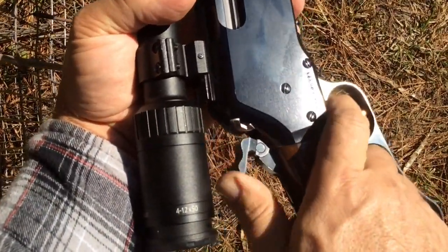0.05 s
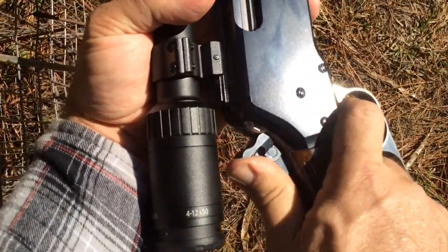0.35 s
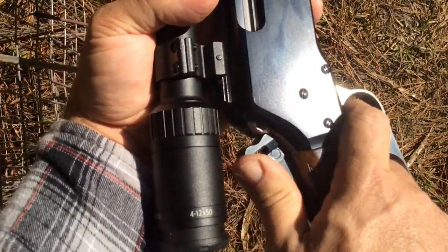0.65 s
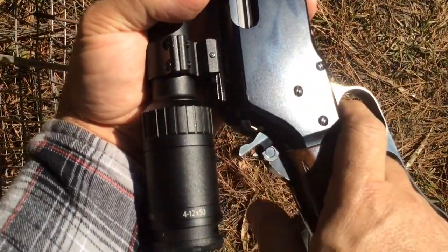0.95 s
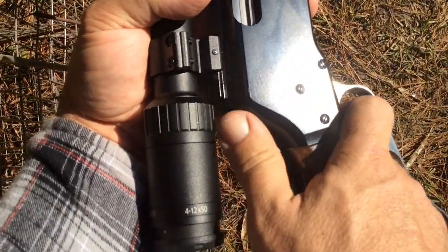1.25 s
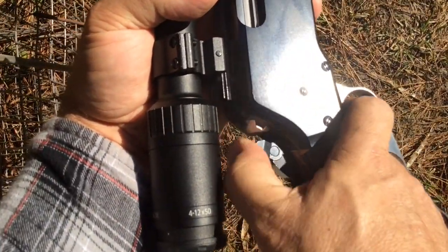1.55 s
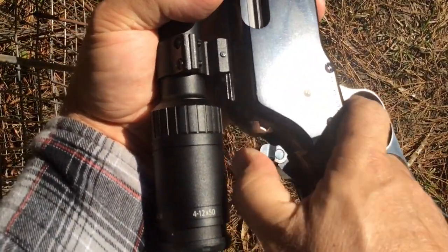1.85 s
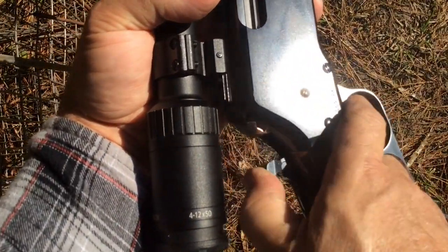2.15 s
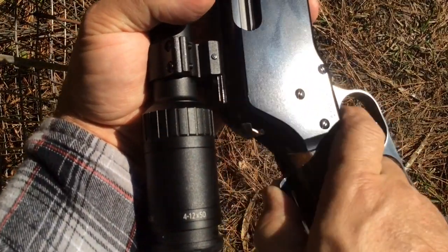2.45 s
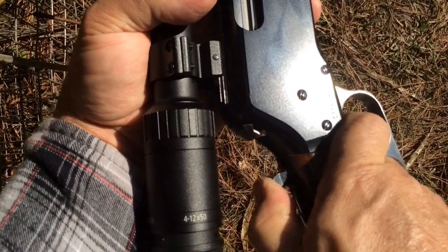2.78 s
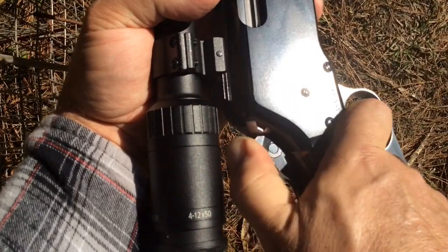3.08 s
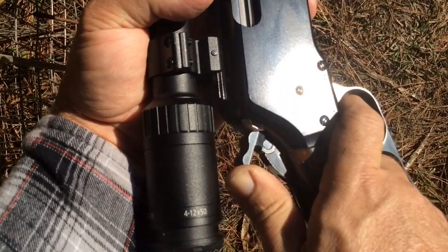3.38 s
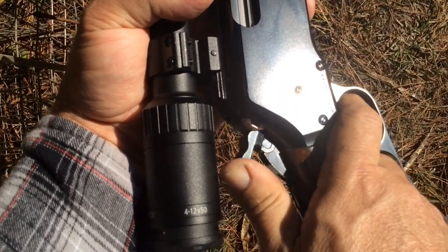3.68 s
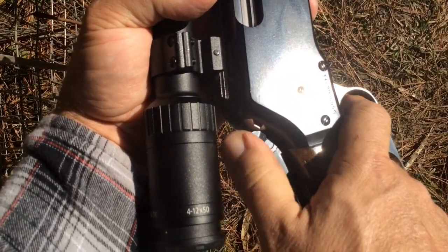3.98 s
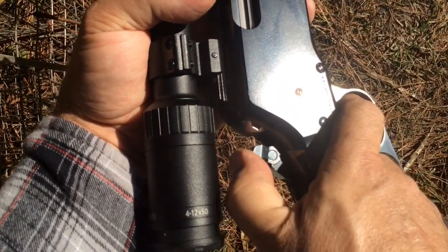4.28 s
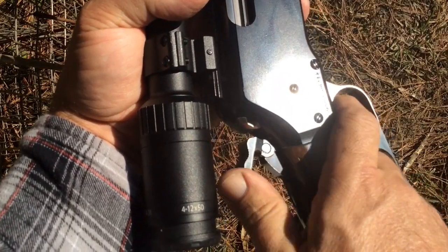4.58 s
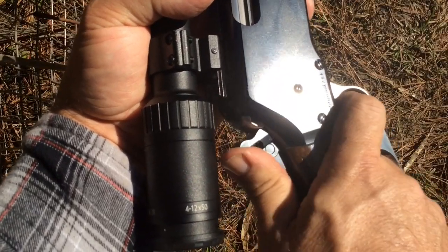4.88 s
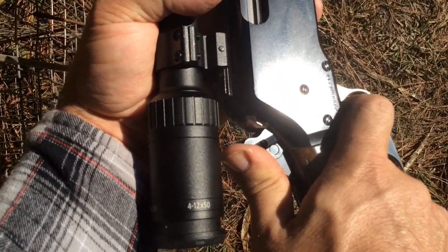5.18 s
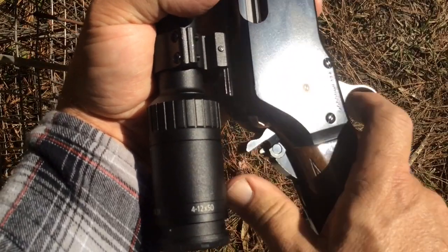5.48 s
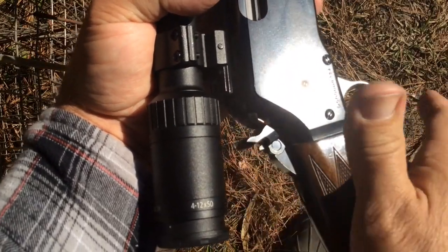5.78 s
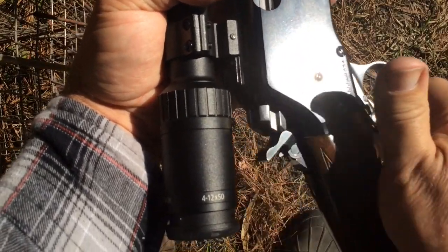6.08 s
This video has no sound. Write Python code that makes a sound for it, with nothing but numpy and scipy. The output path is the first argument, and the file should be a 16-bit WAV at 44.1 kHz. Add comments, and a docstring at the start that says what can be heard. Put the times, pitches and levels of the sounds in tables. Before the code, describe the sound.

A lever-action rifle is handled close to the microphone outdoors, sounding crisp and almost dry. From 0.3 to 0.5 seconds the hammer scrapes and catches in a run of light metallic clicks. A hard snap at 1.6 seconds thumps the wooden stock and briefly rings the springs. A sharp double click follows at 2.5, then a tiny ping and softer clicks around 3.2. Another hard, springy snap lands at 4.3 seconds, followed by small ticks and a firm double click near 4.9. Around 5.7 a hand softly rubs and bumps the stock, and at 6.2 the lever starts opening with a quick cluster of clicks. Behind this is quiet open air, with a small bird's thin rising chirps near 1.3, 2.4 and between 4.1 and 4.6 seconds. A far whirr comes and goes, and a camera ticks very faintly throughout.

```python
"""A lever-action rifle, close by outdoors: a thumb works the hammer, which scrapes, catches and snaps.
Each contact rings the steel receiver, the small parts and the wooden stock; some set springs singing.
At the end the lever starts to open with a quick cluster of clicks, and the hand rubs on the stock.
Behind it: quiet open air, a small bird's thin rising chirps, a far whirr and a camera's faint ticking."""
import sys
import numpy as np
from scipy import signal
from scipy.fft import rfft, irfft, next_fast_len
from scipy.io import wavfile

SR = 44100
rng = np.random.default_rng(int(sys.argv[2]) if len(sys.argv) > 2 else 0)


def bounce(signal):
    """Save signal as a 16-bit WAV file at the path given by the first command-line argument."""
    frames = np.transpose(np.atleast_2d(signal))
    limited = np.clip(frames, -1, 1)
    pcm = np.round(limited * 32767).astype(np.int16)
    wavfile.write(sys.argv[1], SR, pcm)


N = 274743
TIME = np.arange(N) / SR


def from_db(db):
    """Decibels to gain."""
    return 10 ** (np.asarray(db) / 20)


def unit_rms(x):
    """Scale to rms 1."""
    return x / np.sqrt(np.mean(x ** 2) + 1e-20)


def unit_burst(x):
    """Scale a burst to the energy of 10 ms at rms 1."""
    return x / np.sqrt(np.sum(x ** 2) / (SR / 100) + 1e-20)


def add(track, start_s, sound):
    """Mix a sound into a track."""
    at = int(np.clip(round(start_s * SR), 0, N))
    track[at:at + len(sound)] += sound[:N - at]


def butter(x, hz, kind, order=2):
    """Butterworth high- or low-pass."""
    return signal.sosfilt(signal.butter(order, min(hz, .45 * SR), kind, fs=SR, output="sos"), x)


def resonate(x, modes):
    """Parallel resonances of alternating sign, one per (Hz, width Hz, dB) row."""
    out = 0
    for k, (hz, width_hz, db) in enumerate(modes):
        r = np.exp(-np.pi * width_hz / SR)
        poles = [1, -2 * r * np.cos(2 * np.pi * hz / SR), r * r]
        ring = signal.lfilter([1, 0, -1], poles, x + 1e-18)
        out = out + (-1) ** k * from_db(db) * (1 - r * r) / 2 * ring
    return out


def ring_body(force, modes):
    """A struck body: each mode takes a set share of the blow's energy."""
    out = 0
    for k, (hz, width_hz, db) in enumerate(modes):
        ring = unit_burst(resonate(force, [(hz, width_hz, 0)]))
        out = out + (-1) ** k * from_db(db) * np.sqrt(width_hz) * ring
    return unit_burst(out)


def coloured_noise(spectrum):
    """Steady noise at rms 1, shaped by (Hz, dB) rows."""
    hz, db = np.transpose(spectrum)
    size = next_fast_len(N)
    bins_hz = np.maximum(np.fft.rfftfreq(size, 1 / SR), 1)
    gain = from_db(np.interp(np.log(bins_hz), np.log(hz), db))
    return unit_rms(irfft(rfft(rng.standard_normal(size)) * gain, size)[:N])


def swells(rows):
    """One Gaussian swell per (centre s, length s, dB) row."""
    return sum(from_db(db) * np.exp(-(2 * (TIME - s) / length_s) ** 2) for s, length_s, db in rows)


# Spectra of still air and a far rush. Each row: frequency in Hz, relative density in dB.
AIR_SPECTRUM = [(20, -21.5), (35, -7.5), (64, -0.5), (96, -8.5), (221, -9.5), (281, -14.5), (378, -10),
                (470, -14), (1530, -16.5), (2000, -19.5), (3000, -21.5), (6900, -30), (9000, -27.5),
                (15500, -32.5)]
RUSH_SPECTRUM = [(60, -11.5), (200, -4), (380, -0.5), (600, -0.5), (950, -1.5), (1500, 2.5), (1850, -14),
                 (2800, -11), (5000, -18.5), (14000, -27)]
# Course of the rush. Each row: time in seconds, level in dB.
RUSH_LEVELS = [(0, -84), (0.7, -76), (1.2, -86.5), (2.2, -82), (3.85, -72), (4.5, -76), (5.2, -71.5),
               (6.23, -64)]


def open_air(air_db=-69, hum_hz=68, hum_width_hz=14, hum_db=-74.5):
    """Still air, a slowly swelling far rush and a low hum."""
    air = from_db(air_db) * coloured_noise(AIR_SPECTRUM)
    rush_db = np.interp(TIME, *np.transpose(RUSH_LEVELS))
    rush = from_db(rush_db) * coloured_noise(RUSH_SPECTRUM)
    hum = unit_rms(resonate(rng.standard_normal(N), [(hum_hz, hum_width_hz, 0)]))
    return air + rush + from_db(hum_db) * hum


# The two ticks of a camera cycle. Each row: offset in seconds, level in dB, buzz decay in seconds.
TICKS = [(.0095, -75, .003), (0.0287, -74, 0.00092)]
# Tick resonances. Each row: frequency in Hz, width in Hz, gain in dB.
TICK_MODES = [(2380, 350, -7.5), (3815, 410, -9.5), (5530, 300, -4), (8430, 430, -9), (11500, 3900, -20.5)]


def camera_ticks(cycle_hz=30, buzz_gain=.35):
    """Repeating electronic ticks, each a pulse with a trace of buzz."""
    out, t = np.zeros(N), TIME[:SR // 50]
    for offset_s, db, decay_s in TICKS:
        for s in np.arange(offset_s, N / SR, 1 / cycle_hz):
            pulse = (t == 0) + buzz_gain * rng.standard_normal(len(t)) * np.exp(-t / decay_s)
            add(out, s, from_db(db) * ring_body(pulse, TICK_MODES))
    return out


def contact_force(chatter_ms, rise_ms, first_touch=1.2, settle_db=-19, settle_ms=4.2):
    """One contact builds up and chatters densely, then loose parts settle."""
    ms = np.arange(SR // 14) * 1000 / SR
    after_ms = np.maximum(ms - rise_ms, 0)
    decay = np.exp(-after_ms / chatter_ms) + from_db(settle_db) * np.exp(-after_ms / settle_ms)
    envelope = np.minimum(ms / rise_ms, 1) ** 2 * decay
    force = rng.choice([-1., 1.], len(ms)) * envelope
    force[np.argmax(envelope)] += first_touch
    return force


def thud_share_db(contact_db, base_db=-64.5, at_contact_db=-40, db_per_db=0.44):
    """Stock thud relative to its contact; the thud grows more slowly."""
    return base_db + db_per_db * (contact_db - at_contact_db) - contact_db


# Hammer, catch and lever click home. Each row: start in seconds, level in dB, treble share in dB,
# catch share in dB, moving part's pitch in Hz, its ring in dB, chatter in ms.
CLICKS = [(0.3004, -47.5, -21.5, -27, 2080, 9, 0.92), (0.4245, -34, -14, -13, 2100, 9, 2.7),
          (0.4363, -40, -10, -8, 2400, -7, 2.4), (0.4484, -38, -10.5, -10.5, 2860, -7, 2.7),
          (0.5184, -28, -13.5, -11.5, 2830, -2.5, 1.38), (2.4544, -20.5, -2, -11, 3594, -4, .65),
          (2.4763, -24, -15, -17, 2290, -1, 1.2), (2.603, -60, -1, -20, 2620, -10, 4),
          (2.676, -62.5, -8.5, -4, 2680, -4.5, 1.44), (3.1435, -37.5, -10.5, -12.5, 1620, -6.5, 1.66),
          (3.288, -42, -9.5, -6, 2780, 0.5, 1.27), (4.2087, -41, -20, -26, 1628, -1, 1.93),
          (4.3133, -16.5, -4.5, -14.5, 3070, -6.5, 1.6), (4.6107, -44, -22.5, -27, 2370, 3, 1),
          (4.7918, -47.5, -16.5, -20, 2176, 14, 1.25), (4.9296, -27.5, -5.5, -3.5, 2280, -4.5, 0.47),
          (4.9524, -23.5, -11.5, -13, 2950, 0.5, 2.72), (6.029, -50, -32.5, -15.5, 2360, 2, 2),
          (6.1799, -28, -15.5, -13.5, 3450, -2.5, 1.2), (6.2148, -35, -19, -12, 1800, -7, 1.55)]
# The hammer snap that also thumps the stock. As a click, plus thud share in dB.
THUMPING_SNAP = (1.6383, -16, -1.5, -12.5, 1640, -6, 2.5, -19.5)


def clicks():
    """Contact rows for the thumping snap and the other distinct clicks."""
    return [THUMPING_SNAP] + [(s, db, *rest, thud_share_db(db)) for s, db, *rest in CLICKS]


# Parts drag in runs of slips. Each row: start in seconds, length in seconds, first slip in dB,
# last slip in dB, treble share in dB, pitch in Hz.
SLIP_RUNS = [(0.4144, .006, -51, -39, -25, 1800), (0.452, .005, -37, -45.5, -19.5, 1460),
             (1.6272, .0065, -37, -31.5, -15, 1750), (3.2957, .007, -55, -57, -15, 1840),
             (4.44, 0.0088, -56, -67, -19, 1710), (4.9088, 0.0035, -43, -38, -25, 2070),
             (4.933, 0.014, -43.5, -56, -18, 1540), (6.173, .0165, -34, -35, -15.5, 2700)]
# Play in the action. Each row: start in seconds, level in dB, treble share in dB.
TAPS = [(2.0055, -61.5, -12), (2.1006, -65, -11), (3.2554, -66.5, 1.5), (5.1795, -63, -16.5),
        (5.4193, -55, -26.5), (6.108, -57.5, -15)]


def slips_and_taps(slip_gap_s=.0054, slip_chatter_ms=2.8, tap_hz=1630, tap_chatter_ms=1.62):
    """Contact rows for light touches; harder ones ring the catch more and the moving part less."""
    touches = [(s, db, treble_db, tap_hz, tap_chatter_ms) for s, db, treble_db in TAPS]
    for s, length_s, first_db, last_db, treble_db, hz in SLIP_RUNS:
        for u in np.linspace(0, 1, 1 + max(1, round(length_s / slip_gap_s))):
            db = first_db + u * (last_db - first_db)
            touches.append((s + u * length_s, db, treble_db, hz, slip_chatter_ms))
    rows = []
    for s, db, treble_db, hz, chatter_ms in touches:
        catch_db = -10.5 + 0.76 * treble_db
        part_db = -7.5 - 0.46 * treble_db
        thud_db = thud_share_db(db) + 1.5   # light touches thump the stock a little more
        rows.append((s, db, treble_db, catch_db, hz, part_db, chatter_ms, thud_db))
    return rows


# Modes of the hand-damped receiver, small steel parts, hammer catch and wooden stock.
# Each row: frequency in Hz, width in Hz, gain in dB.
RECEIVER_MODES = [(875, 460, -24.5), (1278, 110, -7), (1512, 250, -1), (1676, 210, 1), (2165, 260, -2.5),
                  (2380, 270, -2), (2830, 190, -1), (3180, 300, -5.5), (3602, 270, -1), (4260, 650, -5)]
STEEL_MODES = [(6430, 650, -2.5), (7450, 320, -2), (8150, 170, -1), (8650, 430, -1.5), (9400, 1000, -4.5),
               (10774, 270, -4), (12050, 610, -4.5), (14100, 310, -6), (14590, 450, -6.5)]
CATCH_MODES = [(4916, 270, -5), (5750, 390, 1)]
STOCK_MODES = [(216, 110, -16), (424, 70, 0.5), (650, 56, -4), (900, 170, -0.5)]


def rifle_action(receiver_db=-2.5, part_width_hz=290, steel_rise_ms=0.57, bass_cut_hz=1100):
    """Each contact rings the receiver, moving part, small steel parts, catch and stock."""
    out = np.zeros(N)
    for s, db, treble_db, catch_db, part_hz, part_db, chatter_ms, thud_db in clicks() + slips_and_taps():
        rise_ms, steel_chatter_ms = .4 * chatter_ms, 0.72 * chatter_ms
        hardness = 2 ** (treble_db / 22)   # hard contacts reach higher modes
        receiver = ring_body(contact_force(chatter_ms, rise_ms), RECEIVER_MODES)
        part = unit_burst(resonate(contact_force(chatter_ms, rise_ms), [(part_hz, part_width_hz, 0)]))
        body = from_db(receiver_db) * receiver + from_db(part_db) * part
        body = butter(body, bass_cut_hz, "high", order=7)   # a small body radiates little bass
        body = butter(body, 6300 * hardness, "low", order=3)
        steel = ring_body(contact_force(steel_chatter_ms, steel_rise_ms), STEEL_MODES)
        steel = butter(butter(steel, 5600, "high"), 12000 * hardness, "low", order=1)
        catch = ring_body(contact_force(steel_chatter_ms, steel_rise_ms), CATCH_MODES)
        catch = butter(catch, bass_cut_hz, "high")
        stock = ring_body(contact_force(chatter_ms, rise_ms), STOCK_MODES)
        stock = butter(butter(stock, 1000, "low"), 170, "high")
        for sound, share_db in ((body, 0), (steel, treble_db), (catch, catch_db), (stock, thud_db)):
            add(out, s, from_db(db + share_db) * unit_burst(sound))
    return out


# Spectrum of the rifle's shiver. Each row: frequency in Hz, relative density in dB.
SHIVER_SPECTRUM = [(60, 1.5), (200, 5), (700, -2.5), (1500, 1), (3300, 1), (5500, -6), (9000, -5.5),
                   (15000, -9)]


def shiver(share_db=-32, t60_s=0.18):
    """After each click, countless weak modes of barrel, scope and stock die away as a soft hiss."""
    envelope, t = np.zeros(N), TIME[:SR // 3]
    for s, db, *_ in clicks():
        add(envelope, s, from_db(db + share_db - 60 * t / t60_s))
    return envelope * coloured_noise(SHIVER_SPECTRUM)


# Metal slides under the thumb; the palm bumps the stock.
# Each row: centre in seconds, length in seconds, level in dB.
THUMB_SLIDES = [(0.444, 0.012, -38), (0.468, 0.018, -55), (2.40, 0.16, -68), (2.489, .005, -39),
                (2.93, 0.064, -66.5), (3.072, 0.052, -57), (4.20, 0.029, -64.5), (4.30, 0.029, -58),
                (5.649, 0.008, -59), (5.712, .01, -63), (6.15, .07, -60)]
PALM_BUMPS = [(5.672, 0.014, -55.5)]


def handling(slips_per_s=700, steel_db=-17, thumb_top_hz=2800, palm_top_hz=600):
    """Sliding sends a stream of tiny slips into the metal; the palm only thumps the wood."""
    slips = (rng.random(N) < slips_per_s / SR) * rng.standard_normal(N)
    receiver = butter(resonate(slips, RECEIVER_MODES), thumb_top_hz, "low")
    scrape = unit_rms(receiver + from_db(steel_db) * resonate(slips, STEEL_MODES))
    rumble = butter(rng.standard_normal(N), palm_top_hz, "low")
    thump = unit_rms(butter(rumble, 60, "high"))
    return swells(THUMB_SLIDES) * scrape + swells(PALM_BUMPS) * thump


# Bird chirps. Each row: start in seconds, top pitch in Hz, relative level in dB.
CHIRPS = [(1.290, 7470, -69), (2.190, 8430, -76), (2.390, 8000, -66.5), (2.518, 7970, -66.5),
          (4.143, 7890, -67), (4.566, 8150, -69), (4.612, 7200, -71)]


def bird(length_s=.046, start_ratio=.79, sweep_rate=5, waver_rms_hz=150, overtone_db=-21):
    """Thin, slightly hoarse whistles that sweep up fast and level off."""
    out, u = np.zeros(N), np.linspace(0, 1, int(length_s * SR))
    envelope = np.sqrt(np.abs(np.sin(np.pi * u ** .7)))
    for s, top_hz, db in CHIRPS:
        pitch_hz = top_hz * (1 - (1 - start_ratio) * np.exp(-sweep_rate * u))
        waver_hz = waver_rms_hz * unit_rms(butter(rng.standard_normal(len(u)), 500, "low"))
        phase = 2 * np.pi * np.cumsum(pitch_hz + waver_hz) / SR
        whistle = np.sin(phase) + from_db(overtone_db) * np.sin(2 * phase)
        add(out, s, from_db(db) * envelope * whistle)
    return out


# Spring modes. Each row: frequency in Hz, gain in dB, T60 in seconds.
SPRING_MODES = [(1890, -15, .12), (2946, 0, .13), (3330, -8.5, 0.083), (3946, -16.5, 0.14)]
# Hard snaps that excite the springs. Each row: start in seconds, ring level in dB.
SPRING_SNAPS = [(1.640, -45), (2.456, -50), (4.315, -38), (4.954, -55)]


def springs(ping_start_s=2.677, ping_hz=2570, ping_db=-47.5, ping_t60_s=0.075):
    """Springs ring on after hard snaps; a small moving part pings as the hammer comes to rest."""
    out, t = np.zeros(N), TIME[:SR // 3]
    rings = [(s, hz, db + mode_db, t60_s) for s, db in SPRING_SNAPS for hz, mode_db, t60_s in SPRING_MODES]
    rings.append((ping_start_s, ping_hz, ping_db, ping_t60_s))
    for s, hz, db, t60_s in rings:
        add(out, s, from_db(db - 60 * t / t60_s) * np.sin(2 * np.pi * hz * t))
    return out


# Swells of a far whirr. Each row: centre in seconds, length in seconds, level in dB.
WHIRRS = [(2.58, .3, -75), (2.93, .25, -77), (5.47, 0.24, -77), (5.8, .37, -79.5)]


def whirr(centre_hz=2946, width_hz=180):
    """A narrow band of distant noise comes and goes."""
    band = [(centre_hz, width_hz, 0)]
    return swells(WHIRRS) * unit_rms(resonate(resonate(rng.standard_normal(N), band), band))


def scatter(x, t60_s, top_hz, delay_s):
    """Diffuse reflections from the ground and trees."""
    t = TIME[:SR // 2]
    tail = rng.standard_normal(len(t)) * from_db(-60 * t / t60_s) * (t > delay_s)
    tail = butter(tail, top_hz, "low", order=1)
    return signal.fftconvolve(x, tail / np.sqrt(np.sum(tail ** 2)))[:N]


def scene():
    """The rifle is near and almost dry, the bird far and scattered."""
    rifle = rifle_action() + springs() + shiver() + handling()
    rifle = rifle + from_db(-40.5) * scatter(rifle, t60_s=.18, top_hz=13947, delay_s=0.0036)
    chirps = bird()
    chirps = from_db(3.5) * chirps + scatter(chirps, t60_s=0.28, top_hz=12000, delay_s=0.011)
    return (rifle + chirps + open_air() + whirr() + camera_ticks())[None]


def record(dry):
    """Soft peak limiting, then a steep low-pass."""
    cutoff_hz = 15400
    rounded = 1.178 * np.tanh(dry / 1.158)
    return signal.sosfilt(signal.ellip(10, .1, 70, cutoff_hz, fs=SR, output="sos"), rounded)


dry = scene()
out = record(dry)
bounce(out)
```